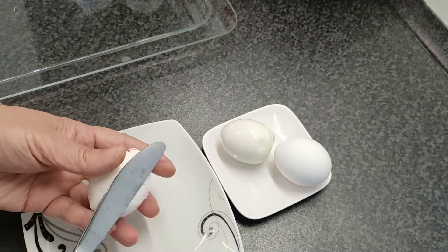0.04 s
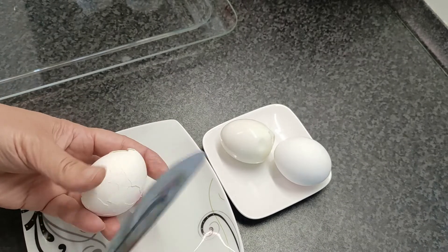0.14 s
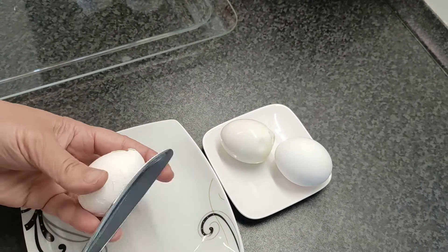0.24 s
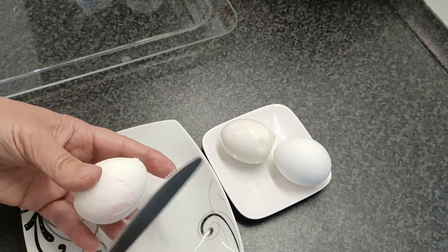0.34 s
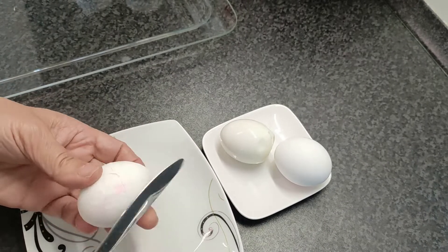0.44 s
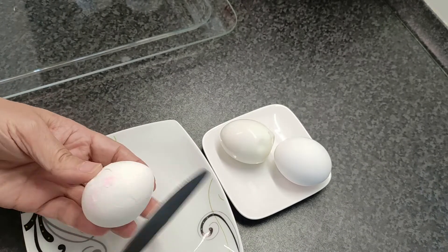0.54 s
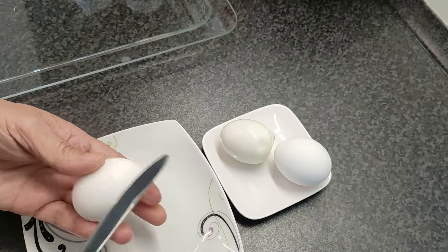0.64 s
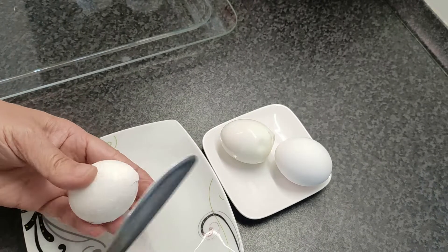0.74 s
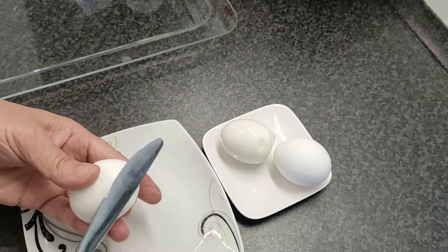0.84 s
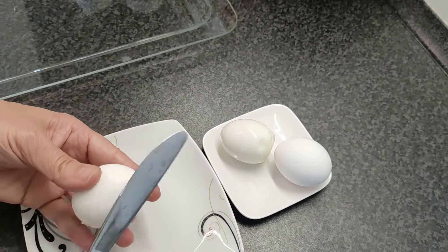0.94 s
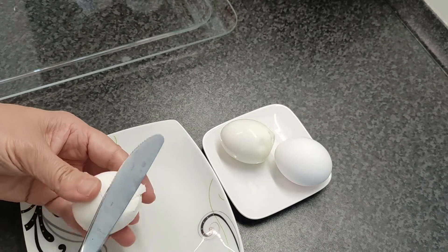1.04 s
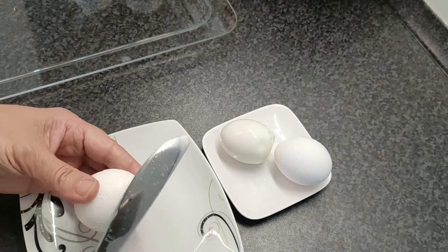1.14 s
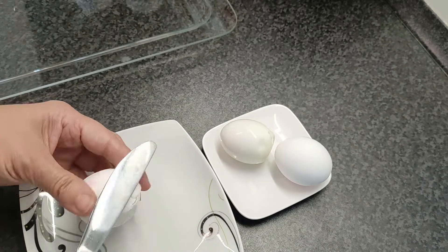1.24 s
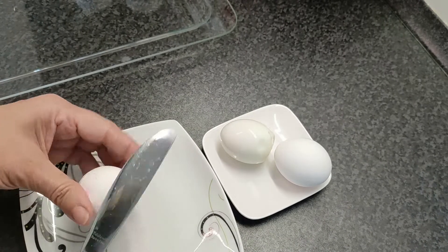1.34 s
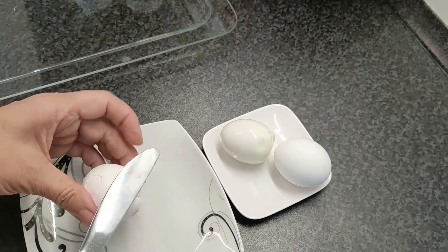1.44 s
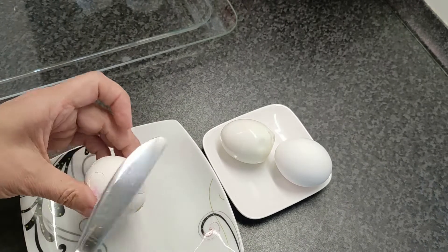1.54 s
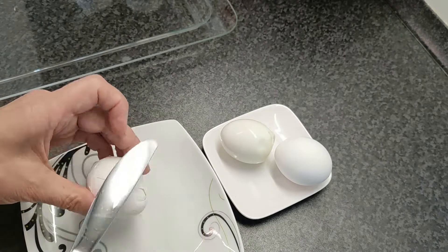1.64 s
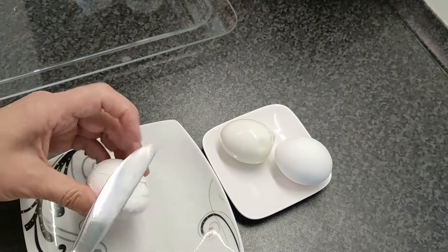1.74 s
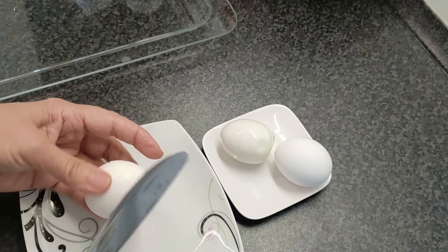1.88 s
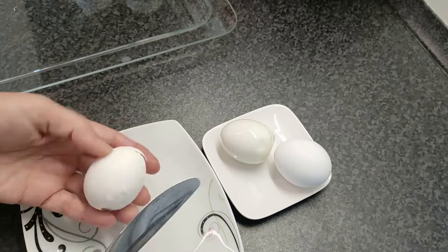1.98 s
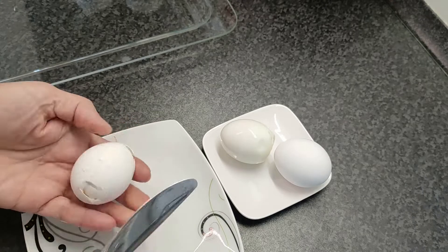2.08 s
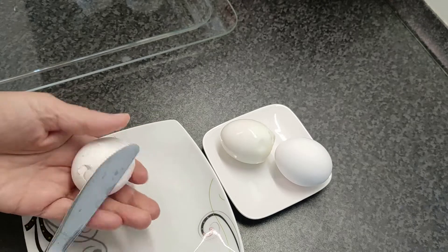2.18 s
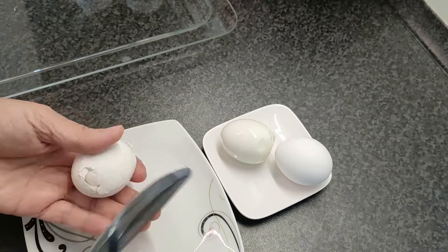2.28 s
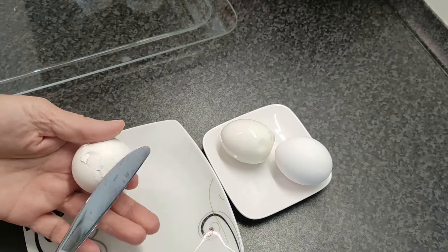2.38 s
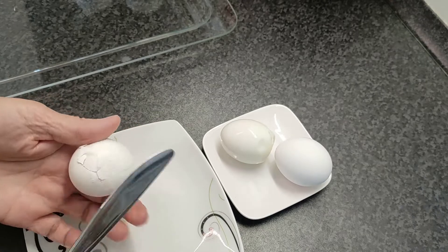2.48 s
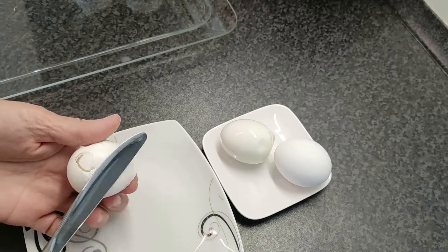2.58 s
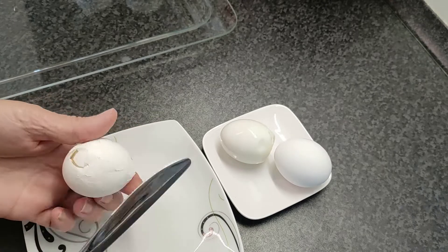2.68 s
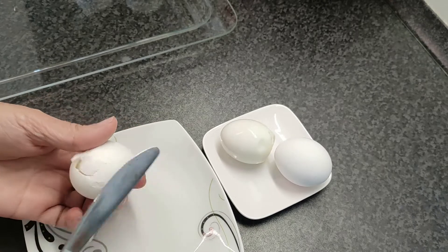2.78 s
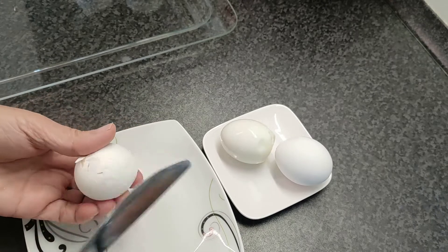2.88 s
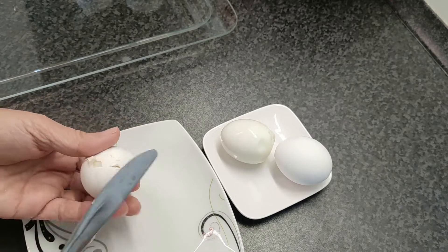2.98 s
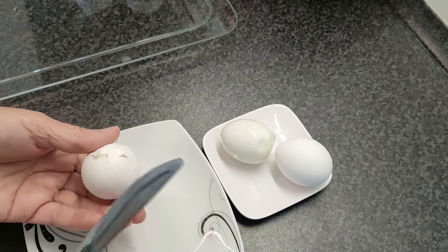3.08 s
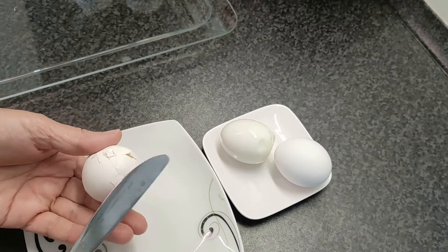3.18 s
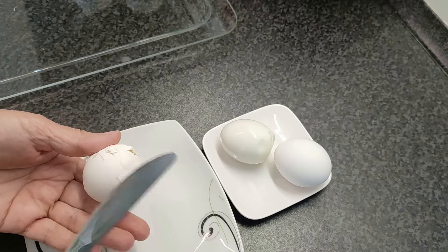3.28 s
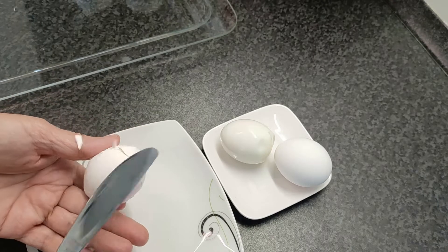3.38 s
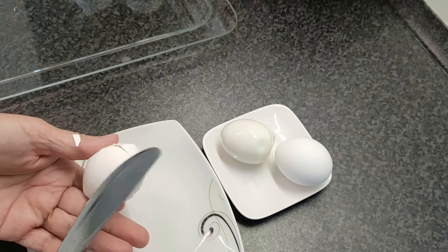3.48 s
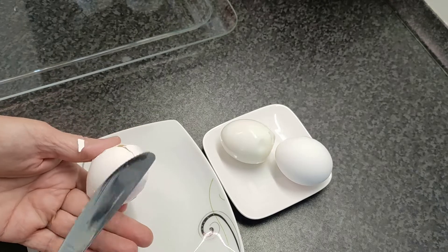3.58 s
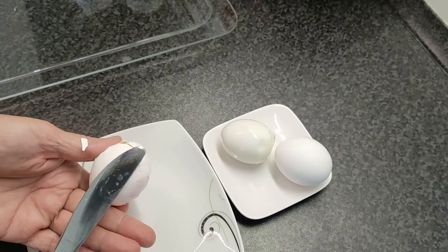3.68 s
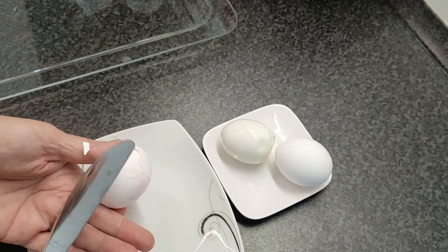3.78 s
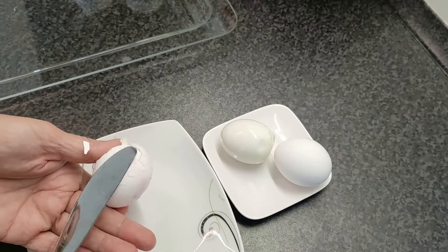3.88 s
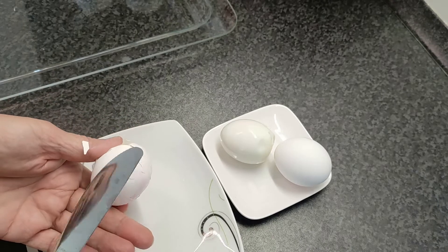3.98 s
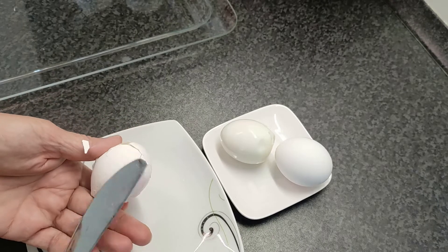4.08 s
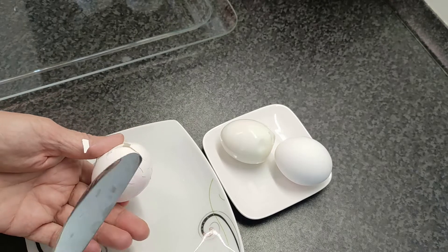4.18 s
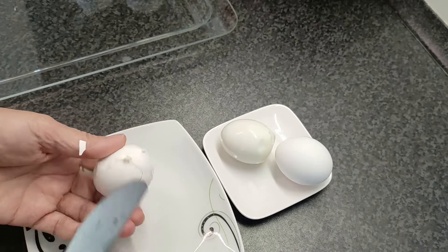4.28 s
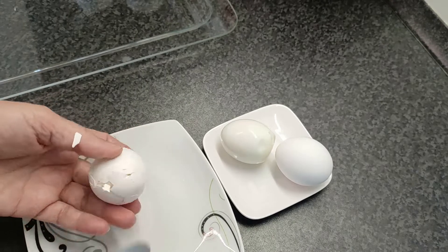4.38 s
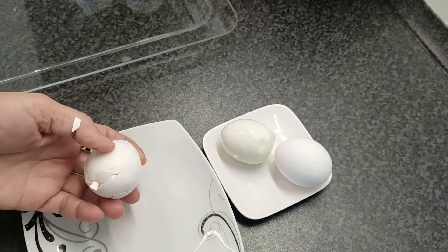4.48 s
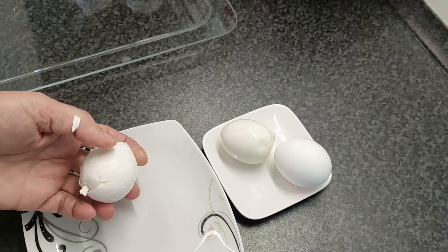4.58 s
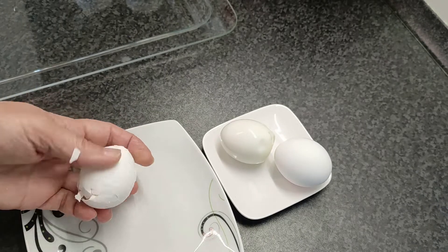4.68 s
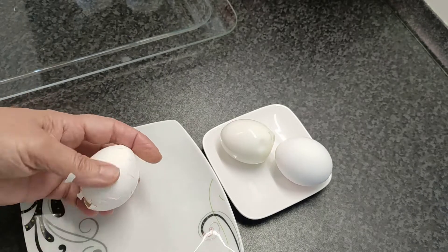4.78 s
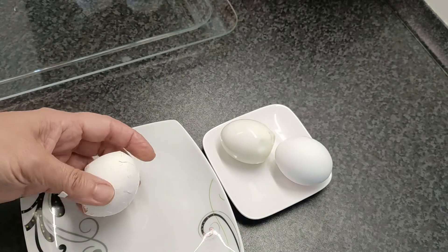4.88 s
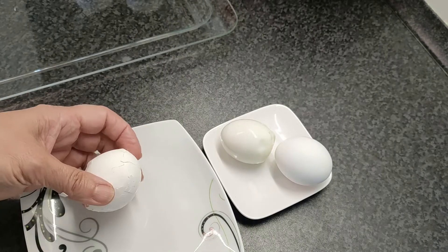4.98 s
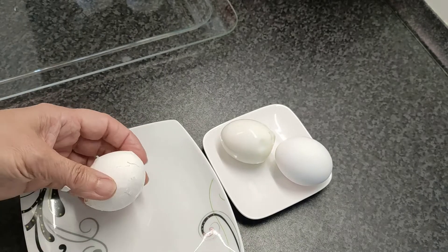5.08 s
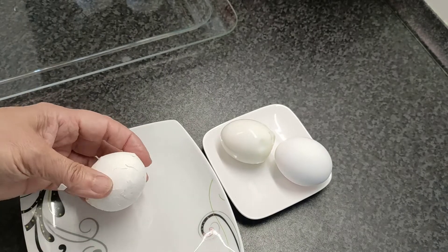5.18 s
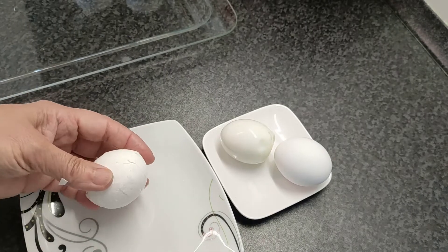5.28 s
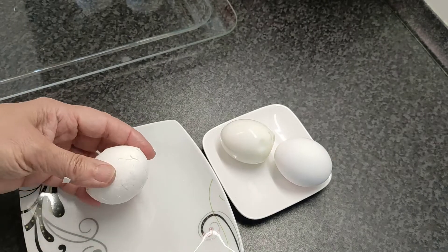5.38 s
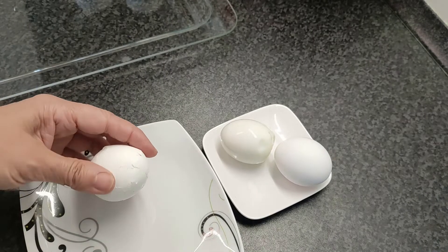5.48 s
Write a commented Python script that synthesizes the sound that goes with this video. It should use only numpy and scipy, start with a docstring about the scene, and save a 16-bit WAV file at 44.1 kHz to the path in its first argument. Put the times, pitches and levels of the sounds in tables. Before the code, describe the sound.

A table knife taps quickly round a hard-boiled egg, cracking the shell, then is laid down with a clatter.

```python
"""A table knife taps round a hard-boiled egg held over a plate; each tap is a swarm of tiny shell
fractures with a brief ring of the blade. Loose flakes crackle between taps and fingers scrape the shell.
At the end the knife is laid down with a clatter, ringing its handle and the worktop.
A fridge hums in the hard-walled kitchen. Two microphone ports listen from above; the left one has
a sharp resonance."""
import sys
import numpy as np
from scipy import signal
from scipy.fft import rfft, irfft
from scipy.io import wavfile
from scipy.ndimage import uniform_filter1d

SR = 44100
rng = np.random.default_rng(int(sys.argv[2]) if len(sys.argv) > 2 else 0)


def waveform_to_disk(signal):
    """Save audio, clipped to [-1, 1], as 16-bit WAV at the path in sys.argv[1]."""
    frames = np.transpose(np.atleast_2d(signal))
    scaled = np.clip(frames, -1, 1) * 32767
    samples = np.round(scaled).astype(np.int16)
    wavfile.write(sys.argv[1], SR, samples)


N = 243873

# knife on shell: start_s, snap_db, body_db, crunch_db, crunch_hz, tick_db, fracture_t60_s, patch_hz
SHELL_TAPS = [(0.0957, -21, -49, -25, 2750, -28.5, 0.01, 7600),
              (0.3042, -21.5, -48.5, -30.5, 2380, -24, 0.013, 6980),
              (0.5098, -36, -59, -35.5, 2880, -34, 0.019, 6800),
              (0.6999, -27.5, -41, -32, 3080, -32.5, 0.04, 6700),
              (0.9243, -22, -46, -38, 2500, -33, 0.0083, 6700),
              (1.0993, -25, -55.5, -42, 3430, -38, 0.038, 7900),
              (1.2853, -19, -55, -41, 2660, -31.5, 0.0063, 7560),
              (1.478, -17, -59, -26.5, 4650, -19, 0.018, 6200),
              (1.6552, -21.5, -53, -26.5, 4350, -28.5, 0.0094, 6130),
              (1.8385, -26, -77, -32, 2900, -25.5, 0.02, 6200),
              (2.2498, -21.5, -57, -27, 2970, -24, 0.011, 6600),
              (2.4508, -24.5, -51.5, -28.5, 3240, -26.5, 0.011, 7200),
              (2.627, -27.5, -57, -28, 3000, -28, 0.013, 6800),
              (2.817, -21, -53, -21.5, 3150, -22.5, 0.012, 6060),
              (3.0195, -21, -48, -18.5, 3220, -21.5, 0.016, 6970),
              (3.2039, -18, -69, -16.5, 3800, -19, 0.017, 6930),
              (3.3945, -18, -46, -17, 3840, -21, 0.0054, 7250),
              (3.587, -23.5, -49, -14.5, 4540, -19, 0.0095, 4600),
              (3.7756, -34, -58, -22.5, 5460, -34, 0.031, 7500),
              (3.9583, -25.5, -59.5, -30.5, 4100, -28.5, 0.013, 6820),
              (4.1326, -23, -53, -30.5, 4040, -30.5, 0.0097, 8300)]
# flakes breaking or shifting: start_s, bright_db, dull_db, patch_hz
SHELL_FLAKES = [(0.2565, -49, -51.5, 5250), (0.8348, -48, -50, 6540), (0.8603, -47, -51, 7290),
                (0.875, -46, -64, 7700), (0.9663, -43, -37.5, 5860), (0.9934, -33.5, -71, 6230),
                (0.9984, -46, -46, 7090), (1.0156, -45, -70, 6840), (1.2026, -44, -51, 7370),
                (1.4328, -47, -57, 7430), (1.465, -49, -66, 7400), (1.739, -55, -72, 6800),
                (1.9489, -52.5, -54, 7490), (2, -55, -77, 7700), (2.0462, -51, -61, 7400),
                (2.0588, -50, -61, 7520), (2.0906, -51, -59.5, 7640), (2.1728, -49.5, -72, 6960),
                (2.384, -43.5, -44.5, 6300), (2.3923, -49, -62, 7570), (2.534, -46, -51, 7430),
                (2.7783, -51.5, -65, 6300), (2.869, -39.5, -47, 6800), (2.956, -47.5, -46, 7230),
                (3.119, -41.5, -42, 3220), (3.141, -44.5, -61, 6800), (3.4906, -55.5, -61, 7410),
                (3.784, -29.5, -58, 7250), (4.456, -52.5, -51.5, 5100), (4.64, -54, -58.5, 7470),
                (4.6534, -59, -67, 6800), (4.7265, -51.5, -61, 7650), (4.74, -56, -59, 4500),
                (4.751, -46, -76, 7180), (4.763, -52, -73, 7520), (4.805, -57, -77, 5500),
                (4.865, -58, -64, 5480), (4.967, -56.5, -67, 4400), (5.016, -64, -64, 4470),
                (5.0636, -57, -62, 7160), (5.083, -54, -62, 4200), (5.11, -43, -54.5, 6750),
                (5.407, -47.5, -53, 5730)]
# dying tail of an earlier tap, then fingers on the shell: time_s, crackle_db, scrape_db
RUSTLE_LEVELS = [(0, -54.5, -52), (.25, -78, -72), (.5, -66.5, -62), (.75, -71, -68), (.85, -52.5, -52),
                 (1.05, -98, -104), (1.3, -63, -60), (1.7, -73, -86), (2.4, -69.5, -66.5), (2.9, -62, -66),
                 (3.3, -81, -83), (4.25, -84, -84.5), (4.4, -67, -82), (4.9, -72.5, -78), (5.53, -66, -74)]
# knife on worktop: start_s, ring_db, thud_db, rattle_db, pan_db
KNIFE_CONTACTS = [(4.977, -72, -52.5, -61.5, -2), (5.2315, -9.5, -35, -22.5, -1.5),
                  (5.266, -51, -39, -46, -6.5), (5.309, -61, -46, -37, -0.5), (5.321, -53, -42.5, -53, -1),
                  (5.364, -63, -50, -59, 0), (5.446, -19, -59, -28.5, 4), (5.486, -43, -47, -30.5, -3.5),
                  (5.513, -15, -28.5, -25.5, 3)]
# handle and worktop modes: pitch_hz, level_db, t60_s
CLATTER_MODES = [(131.4, -23.5, 0.49), (186, -9.5, 0.18), (241, -15.5, 0.098), (313, -15, 0.14),
                 (671, -6, 0.13), (757, -7, 0.11), (882, -11, 0.17), (1063, 0, 0.066), (1100, -5, 0.075),
                 (1160, -6, 0.14), (1255, 6.5, 0.065), (1340, -1, 0.062), (1700, -32, 0.072),
                 (2185, -4.5, 0.048), (2550, -13, 0.072), (3670, -2, 0.033), (4500, -38, 0.028),
                 (4900, -33, 0.035)]
# wall echo decay: freq_hz, t60_s
WALL_DECAY = [(150, 0.52), (1000, 0.3), (4000, 0.31), (14000, 0.2)]
# wall echo stereo image: freq_hz, correlation
WALL_CORRELATION = [(100, 0.99), (300, 1), (1000, 0.082), (3000, 0)]
# room noise spectrum: freq_hz, density_db
ROOM_SPECTRUM = [(10, 8), (20, -8), (40, -9.5), (100, -18), (200, -19.5), (450, -28), (700, -32),
                 (1200, -35.5), (2500, -38.5), (5000, -40), (9000, -53.5), (14000, -39)]
# room noise stereo image: freq_hz, correlation
ROOM_CORRELATION = [(20, 0.13), (130, 0.37), (300, 0.46), (700, 0), (1400, 0.07), (15000, 0.048)]
# left port response: centre_hz, width_hz, gain_db
LEFT_PORT_PEAKS = [(7400, 1200, 10.5), (10400, 3000, -8), (4800, 900, 4), (2250, 500, 2), (1200, 400, 1)]
# right port response: centre_hz, width_hz, gain_db
RIGHT_PORT_PEAKS = [(144, 560, 1), (790, 77, 0.5), (4200, 8800, -2.5), (9120, 1050, 8), (14600, 670, 1)]

TAP_BANDS_HZ = [350, 800, 1400, 2300, 3500, 5000, 7200, 9800, 13000]
FLAKE_BANDS_HZ = [7000, 2500]   # bright, dull
CLATTER_BANDS_HZ = [60, 160, 420, 900, 3500, 7500]   # boom, thud, four rattle bands
RATTLE_OFFSETS_DB = [-7.5, -4.5, -1.5, -4.5]
LEAD_SAMPLES = 128   # silence ahead of each short sound


def knife_taps(knock_hz=2300):
    """The blade knocks, rings and fractures the shell; crumbs follow."""
    start_s, snap_db, body_db, crunch_db, crunch_hz, tick_db, t60_s, patch_hz = np.transpose(SHELL_TAPS)
    snap = band_power(snap_db, centre_hz=7200, fall_db_per_oct=(26.5, 31))
    body = band_power(body_db, centre_hz=800, fall_db_per_oct=(11.5, 3.5))
    crunch = band_power(crunch_db, crunch_hz, fall_db_per_oct=(22.5, 15))
    tick = band_power(tick_db, centre_hz=11300, fall_db_per_oct=(32, 5))
    knock = band_power(snap_db - 19.5, knock_hz, fall_db_per_oct=(20, 34.5))
    bands_db = 10 * np.log10(snap + body + crunch + tick + knock)
    crumbling = crumbs(start_s, snap_db)
    cracks = swarm(bands_db, TAP_BANDS_HZ, t60_s, rise_s=0.00041, per_s=15000, patch_hz=patch_hz)
    ring = blade_ring(bands_db[:, TAP_BANDS_HZ.index(knock_hz)])
    direct, near = place(cracks + ring, start_s, pan_db=np.full(len(start_s), -1.4))
    return np.array([direct + crumbling, near])


def band_power(peak_db, centre_hz, fall_db_per_oct):
    """Power per tap band of a spectral hump."""
    below, above = fall_db_per_oct
    octaves = np.log2(np.array(TAP_BANDS_HZ) / np.reshape(centre_hz, (-1, 1)))
    return from_db(peak_db[:, None] - np.where(octaves < 0, -below, above) * octaves) ** 2


def swarm(bands_db, bands_hz, t60_s, rise_s, per_s, patch_hz=0, size=8192):
    """One dying burst of clicks per contact, its peak level set band by band."""
    t = np.clip(np.arange(size) - LEAD_SAMPLES, 0, size) / SR
    freq_hz = np.fft.rfftfreq(size, 1 / SR)
    attack = (1 - np.exp(-t / rise_s)) ** 2
    decay = from_db(-60 * t / np.reshape(t60_s, (-1, 1)))
    first_break = 1 + from_db(9 - 60 * t / 0.007)
    spectrum = rfft(grit((len(bands_db), size), per_s, spread_db=3) * attack * decay * first_break)
    spectrum /= np.sqrt(uniform_filter1d(np.abs(spectrum) ** 2, size=size // 100))   # flatten
    detune_hz = freq_hz - np.reshape(patch_hz, (-1, 1))
    spectrum *= 1 + from_db(6.5) / (1 + 2j * detune_hz / 900)   # struck patch rings, 900 Hz wide
    octaves, centres = np.log2(freq_hz + 1), np.log2(np.sort(bands_hz))
    knots = np.r_[centres[0] - 1.2, centres, centres[-1] + 1.09]
    out = 0
    for level_db, hz in zip(np.transpose(bands_db), bands_hz):
        triangle = np.interp(octaves, knots, knots == np.log2(hz))
        part = irfft(spectrum * triangle, size)
        peak = np.sqrt(2 * uniform_filter1d(part ** 2, size=88).max(axis=1))
        out = out + part * (from_db(level_db) / peak)[:, None]
    return out


def grit(shape, per_s, spread_db):
    """Random clicks of uneven size and sign."""
    sizes = from_db(spread_db * np.minimum(rng.exponential(1, shape), 4))
    signs = rng.choice([-1, 1], shape)
    return sizes * signs * (rng.random(shape) < per_s / SR) + 1e-9


def blade_ring(level_db, pitch_hz=2260, offset_db=-6, t60_s=0.046, size=8192):
    """Each tap makes the knife blade ring briefly."""
    t = np.clip(np.arange(size) - LEAD_SAMPLES, 0, size) / SR
    return from_db(level_db[:, None] + offset_db - 60 * t / t60_s) * np.sin(2 * np.pi * pitch_hz * t)


def crumbs(start_s, snap_db, offset_db=-24, t60_s=0.26):
    """The shell goes on crumbling after each tap: sparse, fading crackle."""
    kicks = np.zeros(N)
    kicks[(start_s * SR).astype(int)] = from_db(snap_db + offset_db)
    envelope = signal.lfilter([1], [1, -from_db(-60 / t60_s / SR)], kicks + 1e-18)
    return envelope * rms_one(band(grit(N, per_s=250, spread_db=1.5), 2000, 12000))


def flakes():
    """Loose flakes break or shift all round the egg."""
    start_s, bright_db, dull_db, patch_hz = np.transpose(SHELL_FLAKES)
    pan_db = rng.normal(-0.5, 3, len(start_s))
    ticks = swarm(np.c_[bright_db, dull_db], FLAKE_BANDS_HZ, t60_s=0.0051, rise_s=0.00082,
                  per_s=9100, patch_hz=patch_hz, size=2048)
    return place(ticks, start_s, pan_db)


def shell_rustle():
    """An earlier tap's tail dies at the start; then fingers crackle and scrape the shell."""
    time_s, crackle_db, scrape_db = np.transpose(RUSTLE_LEVELS)
    t = np.arange(N) / SR
    crackle = rms_one(band(grit(N, per_s=770, spread_db=0), 3800, 8500))
    scrape = rms_one(band(grit(N, per_s=2800, spread_db=1.5), 1950, 3220))
    crackle *= from_db(np.interp(t, time_s, crackle_db))
    scrape *= from_db(np.interp(t, time_s, scrape_db))
    return crackle + scrape


def knife_down(boom_offset_db=-14.5):
    """Each contact rings the handle and worktop modes, thuds and rattles the blade."""
    start_s, ring_db, thud_db, rattle_db, pan_db = np.transpose(KNIFE_CONTACTS)
    pitch_hz, mode_db, t60_s = np.transpose(CLATTER_MODES)
    t = np.arange(12000)[:, None] / SR
    modes = np.sin(2 * np.pi * pitch_hz * t) * from_db(mode_db - 60 * t / t60_s)
    shape = (len(start_s), len(pitch_hz))
    strengths = from_db(rng.normal(0, 1, shape)) * rng.choice([-1, 1], shape)
    rings = np.pad(strengths @ modes.T, ((0, 0), (LEAD_SAMPLES, 0)))
    rings *= (from_db(ring_db) / np.abs(rings).max(axis=1))[:, None]
    ringing = place(rings, start_s, pan_db)
    bands_db = np.c_[thud_db + boom_offset_db, thud_db, rattle_db[:, None] + RATTLE_OFFSETS_DB]
    jolts = swarm(bands_db, CLATTER_BANDS_HZ, t60_s=0.16, rise_s=0.00044, per_s=7200)
    return ringing + place(jolts, start_s, pan_db)


def place(sounds, start_s, pan_db, near_db=0.5, t60_s=0.035, scatter_hz=497, size=3000):
    """Stereo direct sound and near echoes off plate, hands and worktop, new for each event."""
    t = np.arange(size) / SR
    echoes = grit((len(start_s), 2, size), per_s=6000, spread_db=2)
    echoes *= from_db(-60 * t / t60_s) * np.clip(t / 0.001, 0, 1)
    echoes *= from_db(near_db) / np.sqrt(np.sum(echoes ** 2, axis=2, keepdims=True))
    # long waves pass round hands and plate unchanged
    low = signal.sosfilt(signal.butter(1, scatter_hz, fs=SR, output="sos"), sounds)[:, None]
    high = (sounds[:, None] - low) * pan_gains(pan_db).T[:, :, None]
    direct, near = low + high, signal.fftconvolve(high, echoes, axes=2)
    out = np.zeros((2, 2, N))   # path, channel, sample
    for path, events in zip(out, (direct, near)):
        for onset_s, sound in zip(start_s, events):
            i = round(onset_s * SR) - LEAD_SAMPLES
            path[:, i:i + sound.shape[1]] += sound[:, :N - i]
    return out


def wall_echoes(x, level_db=-10.5, rise_s=0.009, size=26000):
    """Hard walls return a tail that dies band by band."""
    t = np.arange(size) / SR
    edges_hz = 70 * 2 ** np.arange(0, 8.1)
    attack = np.clip(t / rise_s, 0, 1)
    tail = stereo_noise(edges_hz, size, WALL_CORRELATION,
                        lambda hz: from_db(-60 * t / at_hz(WALL_DECAY, hz)) * attack)
    return from_db(level_db) / np.sqrt(size) * signal.fftconvolve(x, tail, axes=1)[:, :N]


def fridge(pitch_hz=494.6, rms_db=-72.5, pan_db=8.5):
    """The motor hums on one steady tone."""
    tone = np.sqrt(2) * np.sin(2 * np.pi * pitch_hz * np.arange(N) / SR)
    return from_db(rms_db) * pan_gains([pan_db]) * tone


def room_tone(rms_db=-53.5):
    """Steady rumble and hiss in half-octave bands."""
    edges_hz = 7 * 2 ** np.arange(0, 11.6, 0.5)
    air = stereo_noise(edges_hz, N + SR, ROOM_CORRELATION, lambda hz: from_db(at_hz(ROOM_SPECTRUM, hz)))
    return from_db(rms_db) * air[:, SR:]


def stereo_noise(edges_hz, size, correlation, gain, top_hz=14350):
    """Noise bands, each with its own gain and left-right correlation; total rms 1."""
    white, out = rng.standard_normal((2, 2, size)), 0
    for k, (low_hz, high_hz) in enumerate(zip(edges_hz, edges_hz[1:])):
        mid, side = band(white[k % 2], low_hz, high_hz)   # adjacent bands are independent
        hz = np.sqrt(low_hz * high_hz)
        alike = at_hz(correlation, hz)
        out = out + gain(hz) * (np.sqrt(1 + alike) * mid + np.sqrt(1 - alike) * side * [[1], [-1]])
    return rms_one(signal.sosfilt(signal.ellip(8, 1, 50, top_hz, fs=SR, output="sos"), out))


def mic_port(x, peaks):
    """Port resonances and dips as a chain of peaking filters."""
    for hz, width_hz, gain_db in peaks:
        a, w = from_db(gain_db / 2), 2 * np.pi * hz / SR
        alpha = np.sin(w) * width_hz / hz / 2
        x = signal.lfilter([1 + alpha * a, -2 * np.cos(w), 1 - alpha * a],
                           [1 + alpha / a, -2 * np.cos(w), 1 - alpha / a], x)
    return x


def from_db(db):
    """Decibels to gain."""
    return 10 ** (np.asarray(db) / 20)


def rms_one(x):
    """Scale to rms 1."""
    return x / np.sqrt(np.mean(x ** 2) + 1e-20)


def at_hz(table, hz):
    """Table lookup on a log frequency axis."""
    freq_hz, values = np.transpose(table)
    return np.interp(np.log(hz), np.log(freq_hz), values)


def band(x, low_hz, high_hz):
    """Band-pass."""
    return signal.sosfilt(signal.butter(2, [low_hz, high_hz], "band", fs=SR, output="sos"), x)


def pan_gains(pan_db):
    """Left and right gains; positive is left."""
    return from_db(np.outer([0.5, -0.5], pan_db))


def scene(right_lag_s=0.00018):
    """Egg and knife in the kitchen, nearer the left port: the right lags."""
    direct, near = knife_taps() + flakes()
    direct += shell_rustle()
    knife_direct, knife_near = knife_down()
    direct += knife_direct
    left, right = direct + wall_echoes(direct) + near + knife_near
    late_right = np.interp(np.arange(N) - round(right_lag_s * SR), np.arange(N), right)
    return np.array([left, late_right]) + fridge() + room_tone()


def record(dry):
    """Each port colours its side; peaks are rounded; the top treble steps down, slopes off and is cut."""
    ceiling, shoulder_hz, cutoff_hz = 0.8, 14350, 16540
    heard = np.array([mic_port(dry[0], LEFT_PORT_PEAKS), mic_port(dry[1], RIGHT_PORT_PEAKS)])
    rounded = ceiling * np.tanh(heard / ceiling)
    above_hz = np.fft.rfftfreq(N, 1 / SR) - shoulder_hz
    treble_db = -12 * np.clip(above_hz / 300, 0, 1) - 26 * np.clip(above_hz / 2200, 0, 1)
    dulled = irfft(rfft(rounded) * from_db(treble_db), N)
    return signal.sosfilt(signal.cheby2(12, 70, cutoff_hz, fs=SR, output="sos"), dulled)


dry = scene()
out = record(dry)
waveform_to_disk(out)
```